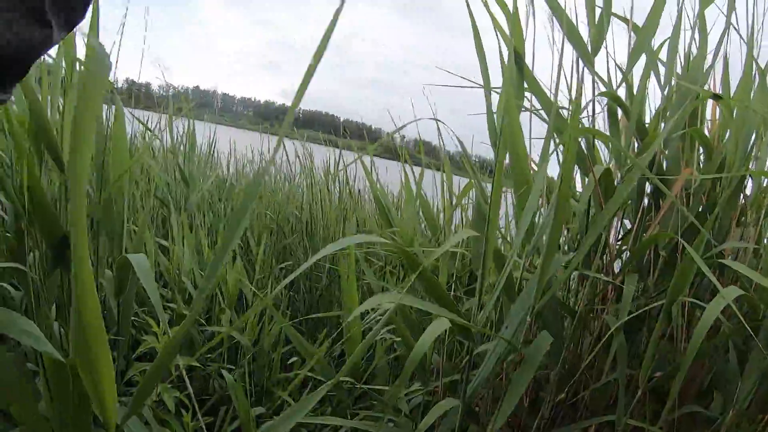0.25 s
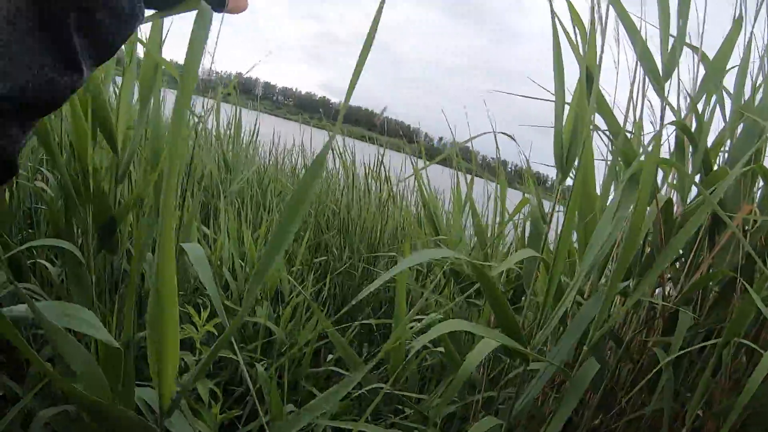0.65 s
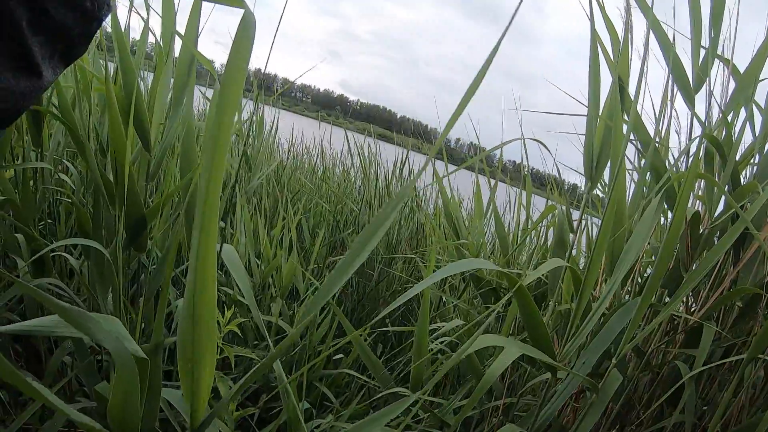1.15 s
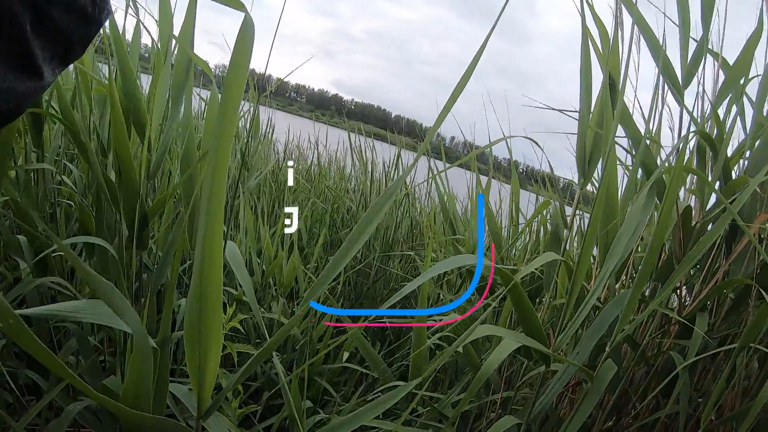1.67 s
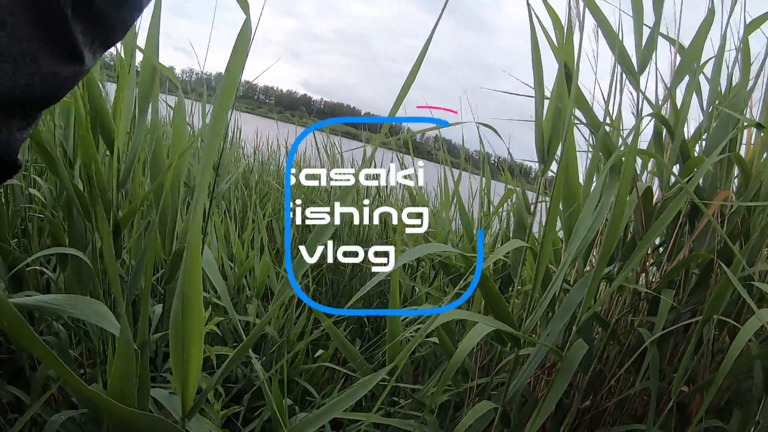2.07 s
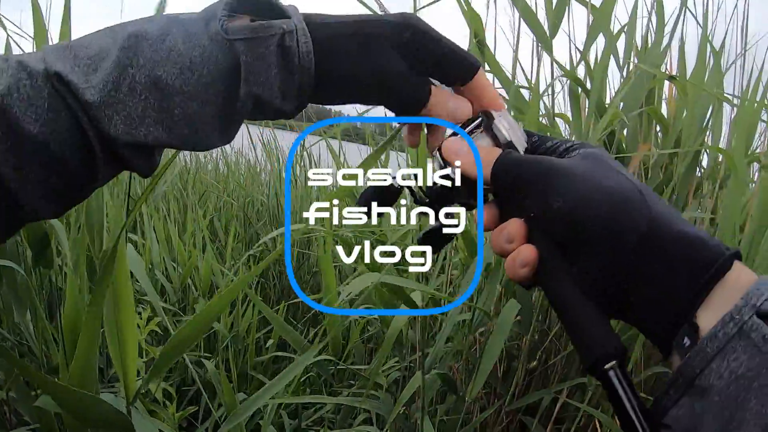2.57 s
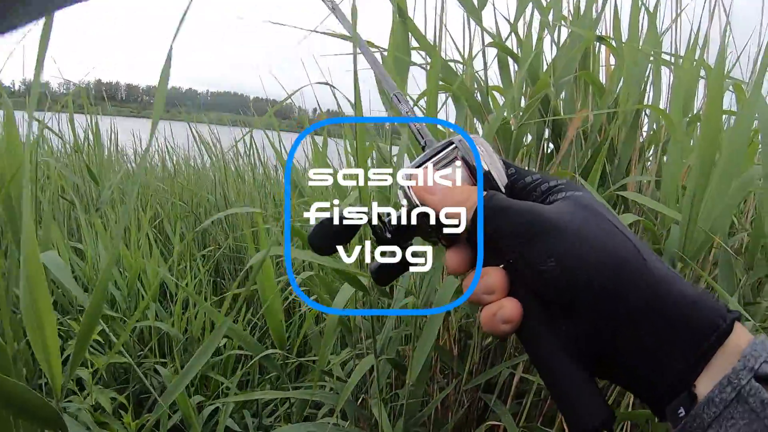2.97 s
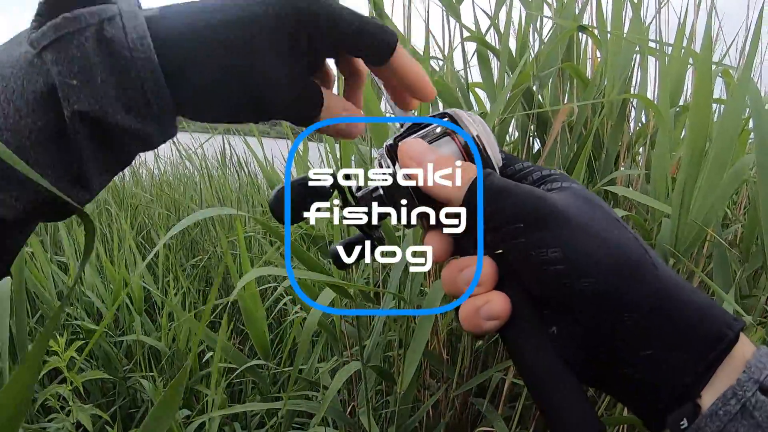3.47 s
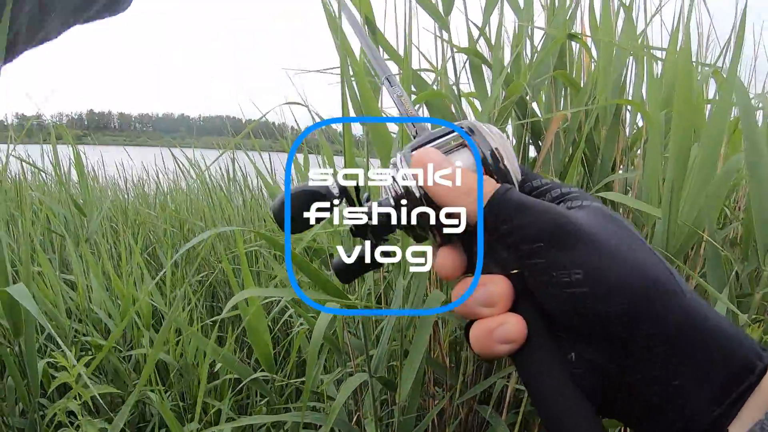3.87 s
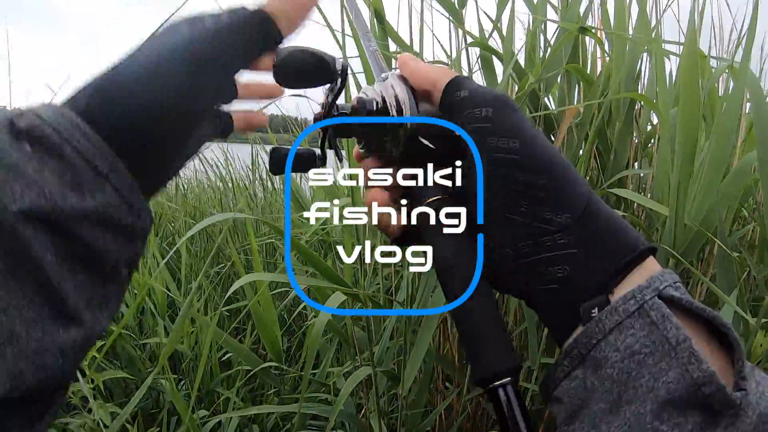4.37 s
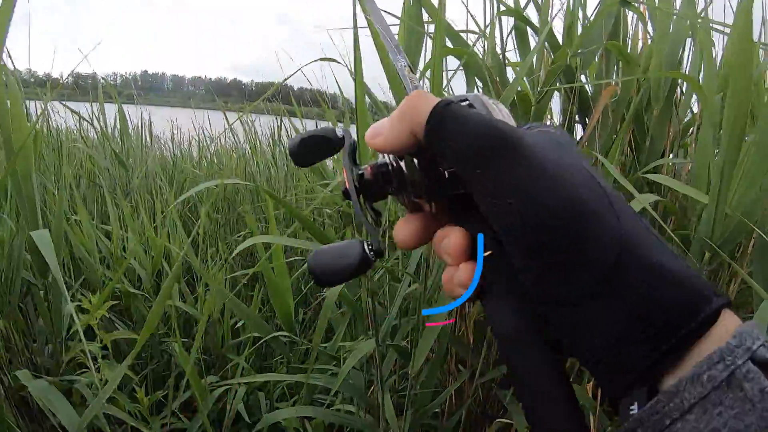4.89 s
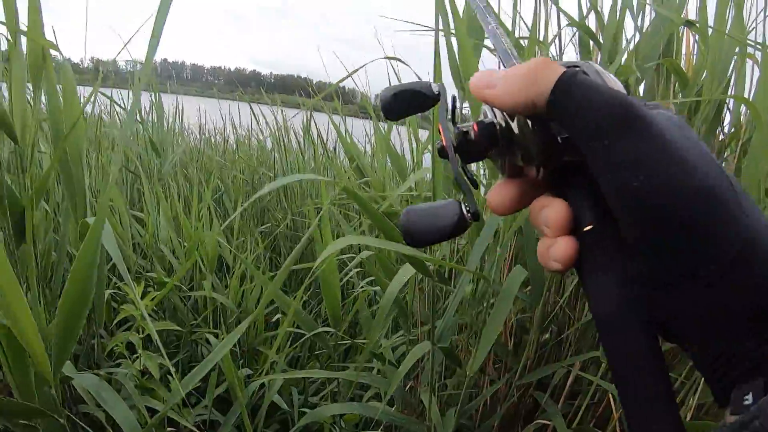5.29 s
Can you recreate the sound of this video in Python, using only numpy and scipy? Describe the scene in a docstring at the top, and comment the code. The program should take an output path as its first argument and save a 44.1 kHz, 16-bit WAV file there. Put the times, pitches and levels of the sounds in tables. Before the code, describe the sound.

Outdoors, very close: leaves brush and stems crack as an angler moves, quieter around one to two seconds, then busier. Jacket scrapes and dull bumps hit the microphone over soft wind rumble and a low drone. Faint gliding chirps come from the right. Fine bright ticks leave the reel near three and four seconds; a hard metallic clack dominates at four and a half, and tiny clicks trail it.

```python
"""From the start an angler in tall lakeside reeds brushes leaves and sleeves past a chest-worn camera: dense grains.
A low drone wavers, wind rumbles as low noise, the jacket taps and rubs the ringing housing; stems and gear crack.
Faint chirps and zips, gliding tones, come from the right throughout; a far engine's hum peaks past two seconds.
From near three seconds line leaves a fishing reel in fine ticks, in two pulls; near 4.5 s the clutch snaps in
with a sharp clack of ringing frame modes, and past five seconds two small clicks follow."""
import sys
import numpy as np
from scipy import signal
from scipy.io import wavfile
from scipy.ndimage import uniform_filter1d

SR = 44100
rng = np.random.default_rng(int(sys.argv[2]) if len(sys.argv) > 2 else 0)


def to_wav(s):
    """Save 16-bit WAV."""
    ch = np.atleast_2d(s).T  # columns
    pcm = np.round(np.clip(ch, -1, 1) * 32767)  # PCM
    wavfile.write(sys.argv[1], SR, pcm.astype(np.int16))


N = 244024
TIME = np.arange(N) / SR


def from_db(db):
    """Decibels to gain."""
    return 10 ** (np.asarray(db) / 20)


def rms_one(x):
    """Scale to unit rms."""
    return x / np.sqrt(np.mean(x ** 2) + 1e-20)


def level(rows):
    """Gain at every sample from (s, dB) rows."""
    return from_db(np.interp(TIME, *np.vstack(rows).T))


def at_hz(points, hz):
    """Read a spectrum on a log-frequency axis."""
    freqs, values = np.transpose(points)
    return np.interp(np.log(hz), np.log(freqs), values)


def pan(left_db):
    """Left and right gains, left_db apart."""
    return from_db(np.array([[left_db], [-left_db]]) / 2)


def bandpass(x, low_hz, high_hz, order=2):
    """Butterworth band."""
    return signal.sosfilt(signal.butter(order, [low_hz, high_hz], "band", fs=SR, output="sos"), x)


def drift(rate_hz):
    """Slow random wander of spread 1: noise through two equal poles, at SR / 40."""
    r = np.exp(-80 * np.pi * rate_hz / SR)
    noise = rng.standard_normal(N // 40 + 2002)
    slow = signal.lfilter([1], [1, -2 * r, r * r], noise)[2000:]  # drop the filter's run-in
    return np.interp(np.arange(N) / 40, np.arange(len(slow)), rms_one(slow))


def ring(force, hz, t60_s):
    """One mode: a unit click rings a decaying sine of height 1."""
    r = from_db(-60 / (t60_s * SR))
    w = 2 * np.pi * hz / SR
    return signal.lfilter([0, np.sin(w)], [1, -2 * r * np.cos(w), r * r], force + 1e-18)


def burst(start_s, decay_s):
    """Envelope that jumps to 1 and dies away."""
    age = TIME - start_s
    return (age >= 0) * np.exp(-np.clip(age / decay_s, 0, 40))


def clicks(times_s, db):
    """A force signal with one impulse per contact."""
    force = np.zeros(N)
    np.add.at(force, np.round(np.asarray(times_s) * SR).astype(int), from_db(db))
    return force


def swell(middle_s, length_s, edge):
    """Envelope that rises, holds 1 around its middle and falls; a larger edge makes it squarer."""
    return 1 / np.sqrt(1 + np.abs(2 * (TIME - middle_s) / length_s) ** (2 * edge))


def swells(rest, rows, edge):
    """Gain of (middle s, length s, dB) swells, added in power to a resting gain."""
    power = sum((from_db(db) * swell(s, length, edge)) ** 2 for s, length, db in rows)
    return np.sqrt(rest ** 2 + power)


def evened(x, window_s):
    """Hold a noise at unit rms over every short window, keeping its grain."""
    power = uniform_filter1d(np.mean(x ** 2, axis=0), max(int(window_s * SR), 2))
    return x / np.sqrt(np.abs(power) + 1e-12)


def without_top(x):
    """The very top falls away above about 11 kHz."""
    return signal.sosfilt(signal.butter(2, 11000, fs=SR, output="sos"), x)


def grains(per_s, spread_db, hiss):
    """Four unrelated streams of tiny slips of uneven size, merging into hiss."""
    born = rng.random(N) < per_s * from_db(4 * drift(15)) / SR
    size = from_db(spread_db * np.minimum(rng.exponential(1, N), 4))
    slips = rms_one(born * size * rng.standard_normal((2, 2, N)))
    return slips + hiss * rng.standard_normal((2, 2, N))


def colour(force, spectrum, patchy_db):
    """Third-octave stereo bands, each with its own level, flutter and left-right likeness."""
    # Each row: frequency in Hz, left-right correlation from 0 to 1.
    likeness = [(30, 1), (120, 0.98), (300, 0.75), (700, 0.16), (1250, 0), (1700, 0.41), (2700, 0.44),
                (4000, 0.69), (7000, 0.048), (10000, 0.089), (15000, 0)]
    out = np.zeros((2, N))
    edges_hz = 16 * 2 ** (np.arange(31) / 3)
    for k, (low, high) in enumerate(zip(edges_hz, edges_hz[1:])):
        if high < spectrum[0][0] or low > spectrum[-1][0]:
            continue
        # neighbouring bands take unrelated streams
        mid, side = bandpass(force[k % 2] + 1e-18, low, high, order=3 if low > 6000 else 2)
        hz = np.sqrt(low * high)
        alike = np.clip(at_hz(likeness, hz), -1, 1)
        gain = from_db(at_hz(spectrum, hz) + patchy_db * drift(37.0))
        out += gain * (np.sqrt(1 + alike) * mid + np.sqrt(1 - alike) * side * [[1], [-1]])
    return out


def brushing():
    """Gains of leaves and sleeves: both follow the stirring and rise with every sweep of an arm."""
    # Stirring, as the level of the sleeves' steady swish. Each row: time in seconds, level in dB.
    stir_rows = [(0, -69), (.4, -60), (.85, -67.5), (1.24, -73), (1.45, -71.5), (1.95, -66.5),
                 (2.35, -53.5), (2.7, -60.5), (3.5, -59.5), (4.45, -60), (4.59, -63.5), (4.72, -56.5),
                 (5.53, -56)]
    # Arm sweeps through the reeds.
    # Each row: middle in seconds, length in seconds, leaf level in dB, sleeve level in dB.
    sweep_rows = [(0.024, 0.068, -47.5, -53), (0.13, 0.06, -56.5, -47), (0.226, 0.085, -49, -56),
                  (0.72, 0.23, -48, -55.5), (0.796, 0.031, -45.5, -50.5), (0.854, 0.027, -48, -62),
                  (0.957, 0.074, -52.5, -60.5), (1.102, 0.052, -54, -62.5), (1.42, 0.16, -54, -68),
                  (1.62, 0.11, -60, -65), (2.508, 0.12, -53, -52.5), (2.761, 0.012, -71, -51.5),
                  (2.97, 0.19, -52.5, -55), (3.257, 0.15, -50, -52), (3.378, 0.048, -48.5, -53.5),
                  (3.67, 0.082, -49, -54), (3.895, 0.18, -51, -54), (3.997, 0.037, -46.5, -50),
                  (4.09, 0.015, -49.5, -48), (4.248, 0.035, -44, -48), (4.338, 0.082, -45.5, -50.5),
                  (4.733, 0.058, -49.5, -69), (5.185, 0.2, -48, -53)]
    # leaf level at mean stirring, share of its swing followed, steepness of a sweep
    leaf_db, leaf_follows, sweep_edge = -54.5, 0.54, 2.4
    stir = level(stir_rows)
    mean_stir = np.exp(np.log(stir).mean())
    leaf_rest = from_db(leaf_db) * (stir / mean_stir) ** leaf_follows
    middle, length, leaf_sweep_db, sleeve_sweep_db = np.array(sweep_rows).T
    leaf_gain = swells(leaf_rest, zip(middle, length, leaf_sweep_db), sweep_edge)
    sleeve_gain = swells(stir, zip(middle, length, sleeve_sweep_db), sweep_edge)
    return leaf_gain, sleeve_gain


def rustle(leaf_gain, sleeve_gain):
    """Dry leaves slide in dense grains; sleeves add a finer swish; clothes and stems shuffle dully."""
    # Spectra. Each row: frequency in Hz, relative density in dB per Hz.
    leaf_colour = [(500, -6), (1000, -4), (1600, 2), (2200, 4.5), (2900, 4), (3500, 0.5), (4300, -1),
                   (6300, -3.5), (8000, -30), (11000, -36), (15000, -80)]
    sleeve_colour = [(2000, -6), (5000, -5), (7000, 2), (9700, 3), (10500, -5), (11500, -16),
                     (14000, -16.5), (16000, -24)]
    shuffle_colour = [(70, -17), (120, -2), (170, 0.5), (280, -5.5), (430, -7), (580, -12.5), (800, -10.5),
                      (1100, -9.5), (2000, -12.5)]
    # Dull shuffle. Each row: time in seconds, level in dB.
    shuffle_level = [(0, -53.5), (.8, -53.5), (1.2, -58), (2.75, -52.5), (3.33, -47.5), (3.5, -54),
                     (4.3, -47.5), (4.62, -51), (5.53, -52.5)]
    leaves = rms_one(colour(grains(per_s=1400, spread_db=3.5, hiss=1.4), leaf_colour, patchy_db=2.0))
    sleeves = rms_one(colour(grains(per_s=3700, spread_db=1.0, hiss=0.75), sleeve_colour, patchy_db=2.0))
    shuffle = rms_one(colour(grains(per_s=900, spread_db=1.5, hiss=1.4), shuffle_colour, patchy_db=2.5))
    # uneven contact pressure, shared by leaves and sleeves
    pressure = from_db(.8 * drift(20))
    brushed = leaves * leaf_gain * pan(-2.75) + sleeves * sleeve_gain * pan(1.0)
    return pressure * brushed + shuffle * level(shuffle_level)


def drone(hz, wander, throb_db, apart):
    """A wavering low tone of unit rms, its phase shaken a little differently at each port."""
    phase = 2 * np.pi * np.cumsum(hz * (1 + wander * drift(7.0))) / SR
    shake = apart * np.array([drift(30), drift(21)])
    return rms_one(np.sin(phase + shake) * from_db(throb_db * drift(43)))


def low_tones():
    """A low drone comes and goes in swells; a far engine's hum grows once and recedes."""
    # Drone swells. Each row: middle in seconds, length in seconds, level in dB.
    swell_rows = [(0.048, 0.13, -50.5), (0.7, 0.27, -49.5), (0.983, 0.17, -50.5), (1.9, .9, -57),
                  (2.394, 0.11, -45.5), (2.818, 0.61, -53), (3.355, 0.04, -38.5), (3.562, 0.32, -49.5),
                  (3.873, 0.19, -50), (4.267, 0.085, -57), (4.343, 0.045, -39), (5.08, 0.18, -57),
                  (5.39, 0.34, -53)]
    drone_rest_db, swell_edge = -62.5, 9.5
    hum_peak_s, hum_length_s, hum_peak_db, hum_rest_db = 2.26, 0.79, -51, -68.5
    presence = swells(from_db(drone_rest_db), swell_rows, swell_edge)
    low = presence * drone(hz=55.4, wander=0.053, throb_db=3.5, apart=0.55)
    nearness = swells(from_db(hum_rest_db), [(hum_peak_s, hum_length_s, hum_peak_db)], edge=2.2)
    hum = nearness * drone(hz=99.3, wander=.022, throb_db=5.5, apart=.2)
    return (low + hum) * pan(-0.32)


def wind():
    """Lumpy low turbulence at the ports: a light breeze with a few gusts."""
    # Gusts. Each row: middle in seconds, length in seconds, level in dB.
    gust_rows = [(.7, 0.24, -55), (3.06, 0.088, -48), (3.367, 0.13, -53), (3.867, 0.14, -51),
                 (4.297, 0.11, -46), (5.144, 0.11, -60)]
    # Spectrum. Each row: frequency in Hz, relative density in dB per Hz.
    wind_colour = [(20, -2), (30, 14), (55, 14), (90, 10), (200, -35), (500, -47)]
    breeze_db, gust_edge = -70, 1.54
    flow = swells(from_db(breeze_db), gust_rows, gust_edge)
    turbulence = rms_one(colour(rng.standard_normal((2, 2, N)), wind_colour, patchy_db=1.5))
    return flow * turbulence * pan(-5.0)


def housing(leaf_gain):
    """Taps rock the camera housing, its two ports in opposite phase; the rustle keeps it faintly ringing."""
    # Taps. Each row: start in seconds, relative level in dB.
    tap_rows = [(0.017, -30), (0.105, -36), (0.203, -31), (0.474, -28), (0.543, -34), (0.562, -34),
                (0.586, -31), (.664, -29), (0.699, -34), (0.835, -37), (0.866, -37), (0.933, -39),
                (1.04, -36), (1.26, -32.5), (1.434, -36), (1.986, -38), (2.099, -26), (5.013, -27),
                (5.134, -31), (5.29, -37)]
    port_hz = 1255  # nominal ring
    knock, scratch_gain = np.zeros(N), np.zeros(N)
    for start_s, db in tap_rows:
        # the cloth loads and damps the housing differently at every tap
        hz = port_hz * rng.uniform(.97, 1.04)
        damping = rng.uniform(.8, 1.6)
        # soft contact: the ring takes a cycle or two to build
        push = ring(clicks([start_s], [0]), hz, t60_s=0.0022)
        tap = ring(push, hz, t60_s=0.053 / damping)
        knock += from_db(db + 0.5) * tap / np.abs(tap).max()
        scratch_gain += from_db(db) * burst(start_s, decay_s=0.0042)
    sympathy = rms_one(ring(rng.standard_normal(N), port_hz, t60_s=0.093)) * leaf_gain * from_db(-11.5)
    # the contact itself scratches briefly, alike at both ports
    scratch = bandpass(scratch_gain * rng.standard_normal(N), 1100, 3200)
    return (knock + sympathy) * pan(-3.0) * [[1], [-1]] + from_db(-8) * scratch


def chirps():
    """Thin chirps and rougher zips on the right: a gliding pitch, blurred into narrow hiss as it roughens."""
    # Each row: middle in seconds, length in seconds, pitch in Hz, glide as share of pitch,
    # arch as share of pitch, roughness from 0 to 1, level in dB before panning.
    chirp_rows = [(.075, .07, 2600, .15, 0, .06, -54), (.125, .07, 5000, .08, 0, .3, -47),
                  (.139, .016, 5400, 0, 0, .12, -43), (.12, .07, 3200, 0, 0, .15, -52),
                  (1.365, .14, 2500, .04, 0, .14, -54.5), (1.47, .12, 2750, .03, 0, .16, -53.5),
                  (1.6, .16, 2600, .03, 0, .2, -57), (1.95, .13, 2930, -.01, 0, .03, -59),
                  (2.2, .16, 2900, -.05, 0, .09, -53), (3.43, .06, 2650, -.12, 0, .1, -52),
                  (3.72, .08, 2600, -.1, 0, .09, -47.5), (4.59, .05, 2480, 0, 0, .04, -56),
                  (4.915, .036, 2720, 0, .29, .008, -48), (5.004, .022, 2950, -.11, .03, .01, -46),
                  (5.163, .04, 3150, .06, .17, .018, -46)]
    out = np.zeros(N)
    for middle_s, length_s, hz, glide, arch, rough, db in chirp_rows:
        place = np.clip(2 * (TIME - middle_s) / length_s, -1, 1)  # -1 at the start, 1 at the end
        pitch_hz = hz * (1 + glide * place - arch * np.abs(place))
        # a random walk of the phase widens the line to about rough * pitch
        blur = np.cumsum(rng.standard_normal(N)) * np.sqrt(2 * np.pi * abs(rough) * hz / SR)
        tone = np.sin(2 * np.pi * np.cumsum(pitch_hz) / SR + blur)
        tone = bandpass(tone, hz * .68, hz * 1.3)
        out += from_db(db) * np.sqrt(1 - place ** 2) * tone
    return out * pan(-10.5)


def jolts(rows, splinter):
    """A thing gives way with a jolt of a few cycles at its own pitch, then splinters a little."""
    out = np.zeros((2, N))
    for start_s, peak_db, hz, cycles in rows:
        splinters = splinter * burst(start_s, decay_s=0.002) * rng.standard_normal((2, N))
        force = clicks([start_s], [0]) + splinters
        jolt = np.diff(ring(force, hz, t60_s=cycles / hz), prepend=0)
        jolt = bandpass(jolt, .55 * hz, min(1.8 * hz, 10000))
        out += from_db(peak_db) * jolt / np.abs(jolt).max()
    return out


def bumps():
    """The body jolts the camera, which rings low for a few cycles."""
    # Each row: start in seconds, peak in dB before panning, pitch in Hz.
    bump_rows = [(0.076, -39, 170), (0.257, -41, 170), (1.06, -49, 151), (3.313, -34.5, 128),
                 (4.242, -32, 194)]
    ring_cycles = 5
    return jolts([(*row, ring_cycles) for row in bump_rows], splinter=0.065) * pan(1.7)


def rubbing():
    """The jacket grips and slides over the housing in fine, dense slips, scraping each port on its own."""
    # Strokes. Each row: middle in seconds, length in seconds, level in dB.
    rub_rows = [(0.295, 0.031, -47), (0.344, 0.048, -49.5), (0.43, 0.061, -51), (0.583, 0.078, -58),
                (0.73, 0.1, -55), (2.928, 0.1, -46), (3.031, 0.022, -39), (3.072, 0.033, -40.5),
                (3.2, 0.075, -42), (3.354, 0.024, -47.5), (3.859, 0.044, -45), (3.919, 0.022, -42),
                (3.989, 0.061, -40), (4.124, 0.043, -48.5), (4.226, 0.04, -42), (4.321, 0.04, -35.5),
                (4.373, 0.043, -39.5)]
    # Housing modes under the cloth. Each row: frequency in Hz, relative level in dB, t60 in seconds.
    cloth_modes = [(1290, 1, 0.043), (1500, -0.5, 0.01), (1744, 3, 0.0064), (2150, -2.5, 0.0065)]
    strokes = sum(from_db(db) / (1 + (2 * (TIME - s) / length) ** 4) for s, length, db in rub_rows)
    friction = grains(per_s=1200, spread_db=3.5, hiss=.6)[0]
    body = np.zeros((2, N))
    for k, (hz, db, t60_s) in enumerate(cloth_modes):
        body += (-1) ** k * from_db(db) * rms_one(ring(friction, hz, t60_s))
    return strokes * evened(bandpass(body, 1100, 2250), window_s=.035)


def cracks():
    """Stems and gear crack and knock, each a short jolt at its own pitch."""
    # Each row: start in seconds, peak in dB, pitch in Hz, ring in cycles.
    crack_rows = [(.3455, -39.5, 2980, 7), (.413, -42, 298, 5.9), (.4945, -40.5, 322, 3.3),
                  (.709, -34, 1610, 17), (.659, -41, 2500, 7), (.778, -35, 890, 3), (.7965, -37, 3550, 40),
                  (2.146, -36, 3040, 25), (2.153, -38, 3250, 25), (2.295, -27, 2760, 6),
                  (3.784, -31, 1640, 5.7), (4.3, -32.5, 920, 6), (4.472, -34, 1540, 7),
                  (4.4862, -31, 2170, 14), (4.4865, -33, 760, 12), (4.609, -38.5, 700, 4.8),
                  (4.626, -36, 2380, 7), (5.3565, -28, 6160, 6.4)]
    return jolts(crack_rows, splinter=.08)


def fishing_line():
    """During a pull coils leave the spool at random, each with a short bright tick; a few stick and tick louder."""
    # Pulls. Each row: middle in seconds, length in seconds, relative level of the fine ticks in dB.
    pull_rows = [(2.93, 0.12, -44.5), (3.856, 0.21, -44)]
    # Coils that stick and let go. Each row: start in seconds, relative level in dB.
    stuck_ticks = [(2.865, -32), (2.8696, -35), (2.8882, -31.5), (2.907, -37), (2.924, -35), (2.932, -33),
                   (2.943, -35), (2.95, -32), (2.972, -38), (3.0198, -39), (3.034, -34), (3.37, -31),
                   (3.7843, -34), (3.807, -43), (3.8151, -28), (3.83, -37), (3.8447, -27.5), (3.8543, -27),
                   (3.866, -38), (3.891, -32), (3.905, -36), (3.9108, -30.5)]
    # Spectrum. Each row: frequency in Hz, relative density in dB per Hz.
    tick_colour = [(900, -9), (1600, 6), (2400, 3), (3300, 2), (5500, -7), (7600, 5.5), (10000, 10),
                   (11500, -12), (15000, -17)]
    ticks_per_s, tick_spread_db, tick_decay_s = 160, 2, .00045
    pulling = sum(from_db(db) * (np.abs(TIME - s) < length / 2) for s, length, db in pull_rows)
    fine = pulling * (rng.random(N) < ticks_per_s / SR) * from_db(tick_spread_db * rng.standard_normal(N))
    force = fine + clicks(*np.transpose(stuck_ticks))
    # each tick builds and fades over about a millisecond
    r = np.exp(-1 / (tick_decay_s * SR))
    envelope = signal.lfilter([0, np.e * (1 - r)], [1, -2 * r, r * r], force + 1e-18)
    noise = colour(rng.standard_normal((2, 2, N)), tick_colour, patchy_db=3.0)
    return from_db(-4) * envelope * evened(noise, window_s=.002)


def reel():
    """The clutch strikes, rebounds and settles; every contact rings the frame and leaves a short rattle."""
    # Contacts of clutch and handle. Each row: start in seconds, relative level in dB,
    # hardness as tilt in dB per octave, extra weight on the low modes in dB.
    clack_rows = [(4.5107, -23.5, 2.5, -5), (4.5217, -16, 4, 8), (4.5225, -5.5, 1.5, 0),
                  (4.5247, -18.5, 6, -1), (4.53419, -25, 3, 10.5), (4.53967, -33, 0, -5)]
    # Frame modes. Each row: frequency in Hz, relative level in dB, t60 in seconds, left over right in dB.
    frame_modes = [(356, -31, 0.19, 0), (441, -28, 0.14, 1), (574, -24, .029, 3), (680, -14.5, 0.028, 10),
                   (770, -21.5, .075, 13), (859, -26, 0.07, 11), (1050, -12.5, 0.011, 9),
                   (1280, -11.5, 0.011, 3), (1650, -10, 0.018, 4), (1800, -29, .055, 2),
                   (2050, -6, 0.0057, 2), (2825, -9.5, 0.0071, 2), (3280, -20.5, .018, 1),
                   (3890, -16, 0.0063, -1), (4436, -19, .014, -3), (5000, -13.5, .0032, -4),
                   (7700, -13, 0.0044, 10), (8670, -19, .011, -6), (8850, -9.5, 0.0036, 7),
                   (10050, -11.5, 0.0038, 2), (14160, -29, .005, -1)]
    start_s, db, hardness, weight_db = np.transpose(clack_rows)
    rattle = sum(from_db(loud) * burst(s, decay_s=.008) for s, loud in zip(start_s, db))
    out = np.zeros((2, N))
    for k, (hz, mode_db, t60_s, left_db) in enumerate(frame_modes):
        tilt_db = hardness * np.log2(hz / 2700)
        force = clicks(start_s, db + mode_db + tilt_db + weight_db * (hz < 1100))
        loose = .017 * from_db(mode_db) * rattle * rng.standard_normal((2, N))
        out += (-1) ** k * pan(left_db) * ring(force + loose, hz, t60_s)
    # the clack carries nothing below about 200 Hz
    return without_top(signal.sosfilt(signal.butter(2, 220, "high", fs=SR, output="sos"), out))


def small_clicks():
    """A small hard part snaps with almost no ring; the right port also gets an echo off the hand."""
    # Clicks of the gear. Each row: start in seconds, relative level in dB.
    snap_rows = [(5.0115, -21), (5.1332, -19)]
    # Its modes. Each row: frequency in Hz, relative level in dB, t60 in seconds.
    snap_modes = [(1400, -8, .012), (1750, -3, .007), (2400, -3, .004), (3900, -5, .003), (5200, -6, .002),
                  (7800, 0, .0024), (9600, 1.5, .0024), (14000, -11, .002)]
    echo_s = .00046
    force = clicks(*np.transpose(snap_rows))
    snap = np.zeros(N)
    for k, (hz, db, t60_s) in enumerate(snap_modes):
        snap += (-1) ** k * from_db(db) * ring(force, hz, t60_s)
    snap = without_top(snap)
    echo = np.interp(TIME - echo_s, TIME, snap)
    return np.array([snap, .6 * snap + .8 * echo])


def scene():
    """Everything as heard from the angler's chest."""
    leaf_gain, sleeve_gain = brushing()
    surroundings = rustle(leaf_gain, sleeve_gain) + low_tones() + wind() + chirps() + cracks()
    handling = housing(leaf_gain) + bumps() + rubbing() + fishing_line() + reel() + small_clicks()
    return surroundings + handling


def record(dry):
    """The top is cut steeply at 15.8 kHz."""
    return signal.sosfilt(signal.ellip(10, .2, 80, 15800, fs=SR, output="sos"), dry)


dry = scene()
out = record(dry)
to_wav(out)
```